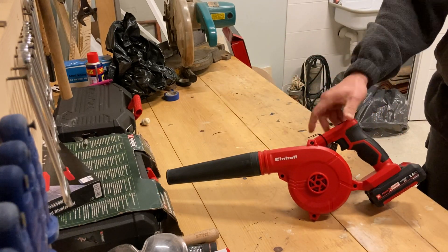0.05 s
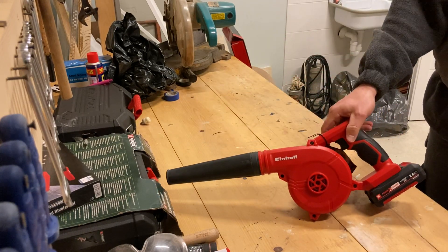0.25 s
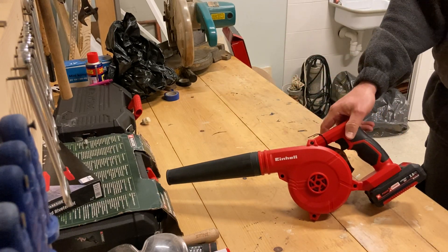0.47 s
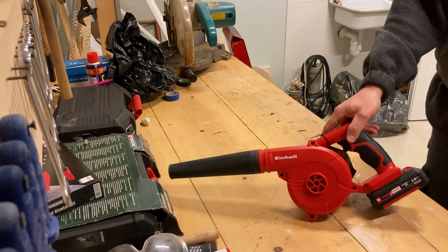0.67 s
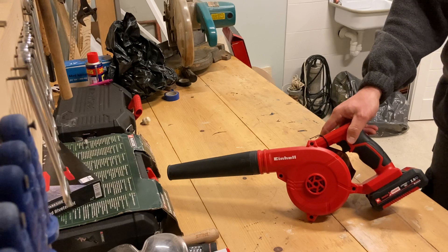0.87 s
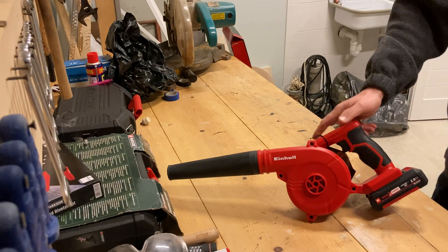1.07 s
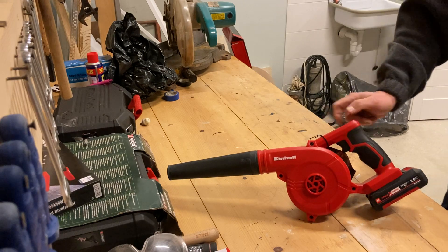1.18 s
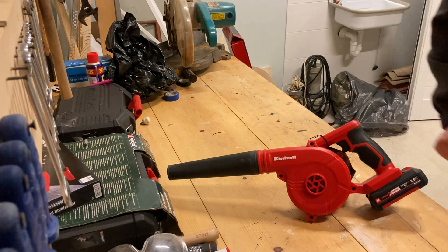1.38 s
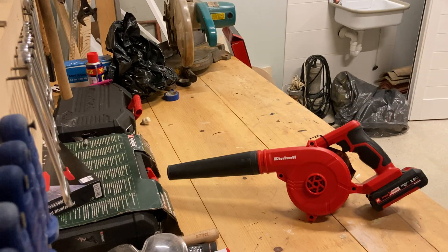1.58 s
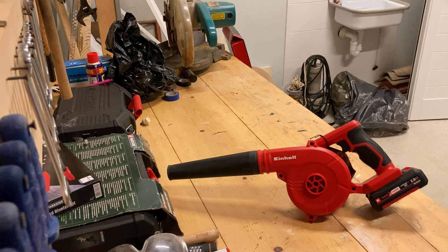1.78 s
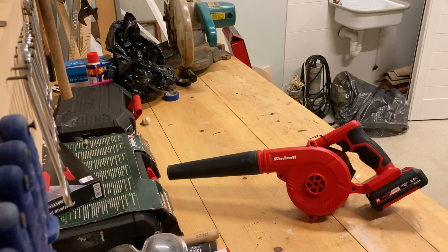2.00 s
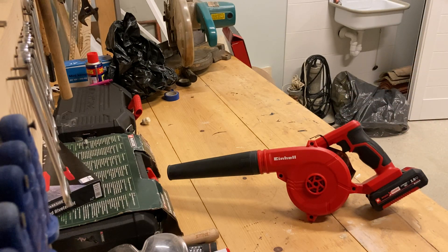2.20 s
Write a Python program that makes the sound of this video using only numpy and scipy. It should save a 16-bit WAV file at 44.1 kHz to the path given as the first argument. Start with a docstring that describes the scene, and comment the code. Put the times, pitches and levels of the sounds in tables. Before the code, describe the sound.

Plastic clack and wooden thud of a cordless blower set on a bench, then faint shuffling.

```python
"""Blower set down on a workbench.

A cordless blower's plastic shell scrapes, ticks and clacks on a wooden bench in a small workshop.
It tips onto its battery with a thud and rocks to rest; the bench top booms and a faint tone sinks.
The person shifts and steps away with a swish of clothing, over quiet room noise."""
import sys
import numpy as np
from scipy import signal
from scipy.fft import rfft, irfft, next_fast_len
from scipy.io import wavfile
from scipy.ndimage import uniform_filter1d

SR = 44100
rng = np.random.default_rng(int(sys.argv[2]) if len(sys.argv) > 2 else 0)


def master_out(mix):
    """Clip the mix to full scale and print it as 16-bit PCM to the path in sys.argv[1]."""
    frames = np.transpose(np.atleast_2d(mix))
    ceiling = np.clip(frames, -1, 1)
    pcm = np.round(ceiling * 32767).astype(np.int16)
    wavfile.write(sys.argv[1], SR, pcm)


N = 99225
T = np.arange(N) / SR
FFT_SIZE = next_fast_len(2 * N)
HZ = np.maximum(np.arange(FFT_SIZE // 2 + 1) * SR / FFT_SIZE, 1)


def from_db(db):
    """Decibels to gain."""
    return 10 ** (np.asarray(db) / 20)


def unit_rms(x):
    """Scale to rms 1."""
    return x / np.sqrt(np.mean(x ** 2) + 1e-20)


def curve(points):
    """Interpolate (Hz, value) rows onto HZ, on a log-frequency axis."""
    hz, values = np.transpose(points)
    return np.interp(np.log(HZ), np.log(hz), values)


def tilt(db_per_octave, pivot_hz):
    """Slope in dB, levelling off three octaves from the pivot."""
    return db_per_octave * np.clip(np.log2(HZ / pivot_hz), -3, 3)


def decay(t_s, t60_s):
    """Exponential decay from time 0."""
    return np.exp(-np.log(1000) * np.maximum(t_s, 0) / t60_s)


def colour(x, gain_db):
    """Minimum-phase filter with a gain at each of HZ."""
    cepstrum = irfft(np.log(from_db(gain_db)), FFT_SIZE)
    cepstrum[1:FFT_SIZE // 2] *= 2
    cepstrum[FFT_SIZE // 2 + 1:] = 0
    return irfft(rfft(x, FFT_SIZE) * np.exp(rfft(cepstrum)), FFT_SIZE)[..., :N]


def convolve(x, response):
    """Mono signal through a stereo response."""
    return signal.fftconvolve(x[None], response, axes=1)[:, :N]


def diffuse(spectrum_db):
    """Shaped stereo noise, partly uncorrelated between the ears; rms 1."""
    # Stereo width. Each row: frequency in Hz, side relative to mid in dB.
    width_db = [(50, -12.5), (200, -21.5), (600, -0.5), (2000, -3), (3200, -1.5), (4800, -3.5), (7000, -16),
                (10000, -41.5), (16000, -35)]
    width = from_db(curve(width_db))
    mid, side = rfft(rng.standard_normal((2, FFT_SIZE)))
    pair = (mid + side * width * [[1], [-1]]) / np.sqrt(1 + width ** 2)
    return unit_rms(irfft(pair * from_db(spectrum_db), FFT_SIZE)[:, :N])


def ring(force, modes):
    """Damped modes driven by a force; neighbours move in opposite directions."""
    out = 0
    for k, (hz, db, t60_s) in enumerate(modes):
        radius, angle = decay(1 / SR, t60_s), 2 * np.pi * hz / SR
        mode = signal.lfilter([.5, 0, -.5], [1, -2 * radius * np.cos(angle), radius ** 2], force + 1e-18)
        out = out + (-1) ** k * from_db(db) * mode
    return out


def soft_contact(start_s, contact_s):
    """Smooth force pulse that sums to 1."""
    pulse = np.sin(np.pi * np.clip((T - start_s) / contact_s, 0, 1)) ** 2
    return pulse / (pulse.sum() + 1e-12)


def room_noise():
    """Quiet, steady rumble with a faint hiss."""
    # Noise spectrum. Each row: frequency in Hz, level in dB.
    spectrum = [(20, -35.5), (28, -23), (38, -11.5), (52, 1), (80, 0), (130, -10), (250, -14.5), (500, -14),
                (1000, -26), (1600, -32), (6000, -38), (10000, -35), (12200, -31.5), (13400, -25),
                (15500, -44.5)]
    return from_db(-66.5) * diffuse(curve(spectrum))


def room_response():
    """The workshop's diffuse tail; treble dies first."""
    # Reverberation time. Each row: frequency in Hz, T60 in seconds.
    bands = [(100, .7), (500, 0.7), (1400, 0.48), (3700, .42), (8000, 0.36), (14000, 0.3)]
    # Tail spectrum. Each row: frequency in Hz, level in dB.
    spectrum = [(60, 2), (400, 3.5), (1000, 6), (2000, 4.5), (4000, -1), (7000, -5.5), (9000, -3.5),
                (11000, -6), (15000, -11)]
    build_s = 0.0049
    noise = rfft(diffuse(curve(spectrum)), FFT_SIZE)
    centres_hz, t60s_s = np.transpose(bands)
    tail = 0
    for weights, t60_s in zip(np.eye(len(bands)), t60s_s):
        band_gain = np.interp(np.log(HZ), np.log(centres_hz), weights)
        tail = tail + irfft(noise * band_gain, FFT_SIZE)[:, :N] * decay(T, t60_s)
    return unit_rms(tail * (1 - np.exp(-T / build_s))) / np.sqrt(N)


def clothing():
    """Cloth rubs in soft, slightly grainy swells."""
    # Each row: peak time in seconds, half length in seconds, level in dB, tilt in dB per octave.
    swishes = [(0.658, 0.052, -67, 6), (0.804, 0.053, -75.5, 1), (1.655, 0.11, -72.5, 3.5),
               (1.708, 0.042, -62, -1.5), (1.796, .1, -73.5, 0), (2.25, 0.086, -70, 0.5)]
    # Rubbing spectrum. Each row: frequency in Hz, level in dB.
    spectrum = [(100, -4), (500, 4.5), (1300, 1), (2500, 3), (4000, -2), (5500, -7.5), (7500, -5),
                (10000, -4), (13000, -12), (16000, -27)]
    grain_db, flatness = 1.5, 2.9
    grain = unit_rms(uniform_filter1d(rng.standard_normal(N), size=200))
    out = 0
    for peak_s, half_s, db, db_per_octave in swishes:
        swell = np.exp(-.5 * np.abs((T - peak_s) / half_s) ** flatness)
        out = out + from_db(db) * swell * diffuse(curve(spectrum) + tilt(db_per_octave, pivot_hz=4080))
    return from_db(grain_db * grain) * out


def feet():
    """Dull, reverberant steps and shuffles; one lands on the heel."""
    # Each row: start in seconds, level in dB, attack and T60 in seconds, tilt in dB per octave.
    steps = [(-.03, -44.5, 0.011, 0.24, -5), (0.77, -56.5, 0.012, 0.42, -1.5),
             (0.809, -56, 0.021, 0.31, -0.5), (1.026, -62, .006, .3, -1.5), (1.109, -67, 0.012, 0.43, -1),
             (1.29, -77, 0.014, 0.11, 4.5), (1.534, -51, 0.0039, 0.69, -1.5),
             (1.681, -60, 0.031, 0.81, -0.5), (1.83, -57, 0.023, 0.4, -1.5),
             (1.915, -52.5, 0.011, 0.08, -8), (2.178, -54, 0.046, .5, -1)]
    # Footfall spectrum. Each row: frequency in Hz, level in dB.
    spectrum = [(30, -15), (70, -6.5), (160, -3), (300, -10.5), (500, -8.5), (1000, -17.5), (2000, -27),
                (5000, -40), (16000, -67)]
    heel_hz, heel_db, heel_t60_s = 168, -35.5, 0.055
    out = ring(soft_contact(start_s=1.542, contact_s=0.0033), [(heel_hz, heel_db, heel_t60_s)])
    for start_s, db, attack_s, t60_s, db_per_octave in steps:
        envelope = np.clip((T - start_s) / attack_s, 0, 1) * decay(T - start_s - attack_s, t60_s)
        noise = diffuse(curve(spectrum) + tilt(db_per_octave, pivot_hz=400))
        out = out + from_db(db) * envelope * noise
    return out


def creep():
    """A faint, wavering tone sinks as the tool settles, like a rubber foot creeping on wood."""
    start_s, end_s, ramp_s = .555, .87, 0.021
    start_hz, sag_hz_per_s, waver_band_hz, waver_hz = 397, 171, 30, 15
    start_db, fade_db_per_s, waver_db = -57.5, 27, 2
    age_s = np.clip(T - start_s, 0, 1)
    lowpass = np.exp(-(HZ / waver_band_hz) ** 2)
    waver = unit_rms(irfft(rfft(rng.standard_normal(FFT_SIZE)) * lowpass, FFT_SIZE)[:N])
    pitch_hz = start_hz - sag_hz_per_s * age_s + waver_hz * waver
    level_db = start_db - fade_db_per_s * age_s + waver_db * waver[::-1]
    gate = np.clip(np.minimum(age_s, end_s - T) / ramp_s, 0, 1)
    return gate * from_db(level_db) * np.sin(2 * np.pi * np.cumsum(pitch_hz) / SR)


def bench(room):
    """The tool lands nose first, then its heavy battery drops and rocks; the bench top booms."""
    # Each row: start in seconds, level in dB, contact time in seconds.
    thuds = [(0.2049, -45, 0.00081), (0.253, -41, 0.0028), (0.4073, -24, 0.0014), (0.4155, -35, .008),
             (.4536, -40.5, 0.00164), (0.4795, -30.5, 0.0043), (0.5272, -28.5, 0.0065), (0.5517, -49, .006),
             (0.6241, -44, 0.0067)]
    # Bench-top modes. Each row: frequency in Hz, gain in dB, T60 in seconds.
    modes = [(93.4, -16, 0.94), (112.2, -12.5, 1), (131.4, -6.5, 0.42), (161, -20, 0.39), (214.3, -8, 0.12),
             (293.7, -17.5, .4), (344, -1, 0.071), (409.8, -21.5, 0.33), (536, -20, 0.14),
             (644, -16.5, 0.16), (872.4, -12, 0.16), (1032, 3, 0.03)]
    echo_db = -19.5
    force = sum(from_db(db) * soft_contact(start_s, contact_s) for start_s, db, contact_s in thuds)
    boom = ring(force, modes)
    return boom + from_db(echo_db) * convolve(boom, room)


def scrape():
    """Force of the nozzle dragging on wood before the main clack: a swell of tiny slips."""
    peak_s, sigma_s, level_db, slips_per_s = 0.18, 0.019, -46.5, 655
    slips = (rng.random(N) < slips_per_s / SR) * rng.standard_normal(N)
    return from_db(level_db) * slips * np.exp(-.5 * ((T - peak_s) / sigma_s) ** 2)


def shell(room):
    """Hard contacts ring the plastic shell; each shakes the small parts in its own way."""
    # Contacts with the bench. Each row: time in seconds, level in dB, tilt in dB per octave.
    clacks = [(0.1318, -46, 1), (0.159, -44, -3.5), (0.164, -42.5, 0), (0.1777, -34, 1), (.1795, -31, -2),
              (0.2037, -15, 0), (0.2046, -30.5, 1.5), (0.226, -56, -9), (0.2432, -39.5, -5.5),
              (.246, -30, -1.5), (.2818, -30, 0.5), (.4108, -40.5, -1.5), (0.775, -58.5, -6),
              (1.031, -62, 5)]
    # Shell modes. Each row: frequency in Hz, gain in dB, T60 in seconds.
    modes = [(380, -30, 0.043), (570, -18.5, 0.055), (917, -28.5, 0.0377), (1345, -34, .02),
             (2676, -18.5, .014), (3700, -18.5, 0.0156), (4460, -29, .02), (7010, -3.5, 0.0038),
             (7340, -5.5, 0.0053), (7700, -6.5, 0.0045), (10250, -5.5, 0.0037), (11830, -14, .004),
             (13300, -13, .003)]
    # Rattle of the small parts. Each row: frequency in Hz, level in dB.
    rattle_spectrum = [(60, -17), (150, 0.5), (400, 6), (800, 0), (1050, 2), (1550, -0.5), (2000, -12),
                       (2750, 1), (3200, -4), (3700, -0.5), (5000, -8.5), (7000, -0.5), (8800, -20.5),
                       (10500, -2.5), (13000, -14), (16000, -34)]
    # Sound sent into the room. Each row: frequency in Hz, gain in dB.
    room_send = [(60, -5.5), (110, 8.5), (220, 3.5), (520, 9.5), (1200, 6), (2050, 0), (2750, 4.5),
                 (3200, 4), (3850, 9.5), (5200, 4.5), (7000, 12), (8800, 4), (10300, 10), (13000, 6),
                 (14500, -4), (16000, -16.5)]
    rattle_db, rattle_t60_s, echo_db = -13, 0.038, -1
    forces = [colour(signal.unit_impulse(N, int(time_s * SR)), db + tilt(db_per_octave, pivot_hz=4150))
              for time_s, db, db_per_octave in clacks]
    forces.append(scrape())
    rattle_decay = decay(T, rattle_t60_s)
    rattle = sum(convolve(force, diffuse(curve(rattle_spectrum)) * rattle_decay) for force in forces)
    echo = convolve(colour(sum(forces), curve(room_send)), room)
    return ring(sum(forces), modes) + from_db(rattle_db) * rattle + from_db(echo_db) * echo


def scene():
    """Blower, bench and person in the quiet workshop."""
    room = room_response()
    return shell(room) + bench(room) + creep() + feet() + clothing() + room_noise()


def record(dry):
    """Small stereo microphone: the sides differ in level and phase; the top is cut."""
    # Channel phase. Each row: frequency in Hz, lead of the left in radians.
    left_lead = [(0, 0), (340, .65), (600, 1.35), (1120, 3.2), (1800, 4.8), (2400, 6.2), (3200, 9.3),
                 (3800, 11.8), (4300, 12.9), (5300, 14.1), (6820, 12.57), (16000, -.12)]
    # Channel balance. Each row: frequency in Hz, left minus right in dB.
    balance = [(60, -0.5), (125, 0.6), (250, 2), (550, 3), (1200, -0.7), (3000, 1.5), (5000, 1.5),
               (8000, 0.5), (15000, -.6)]
    cutoff_hz = 16450
    lead_rad = np.interp(HZ, *np.transpose(left_lead))
    response = from_db(curve(balance) * [[.5], [-.5]]) * np.exp(1j * lead_rad * [[1], [0]])
    heard = irfft(rfft(dry, FFT_SIZE) * response, FFT_SIZE)[:, :N]
    return signal.sosfilt(signal.ellip(10, .1, 80, cutoff_hz, fs=SR, output="sos"), heard)


dry = scene()
out = record(dry)
master_out(out)
```